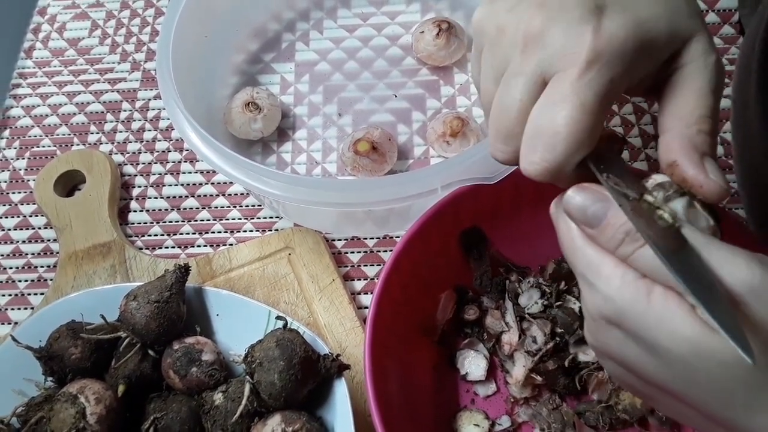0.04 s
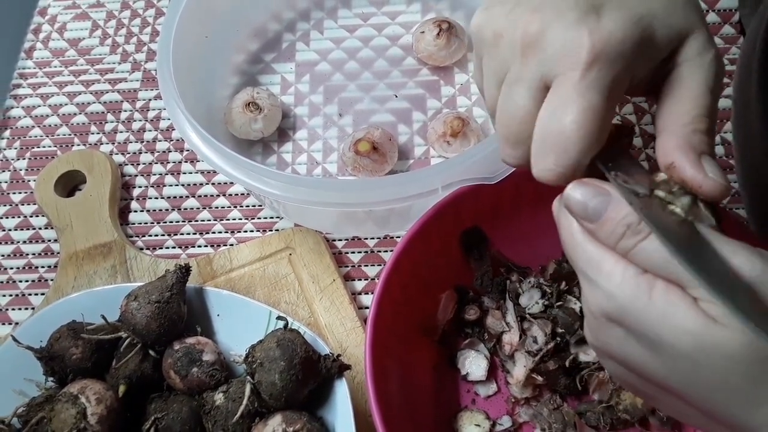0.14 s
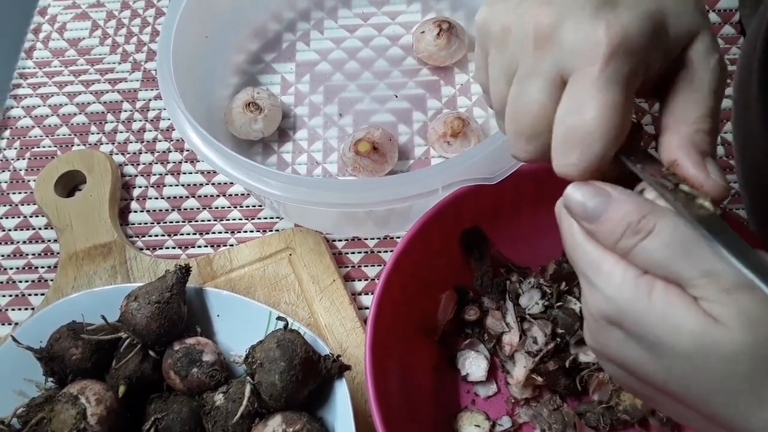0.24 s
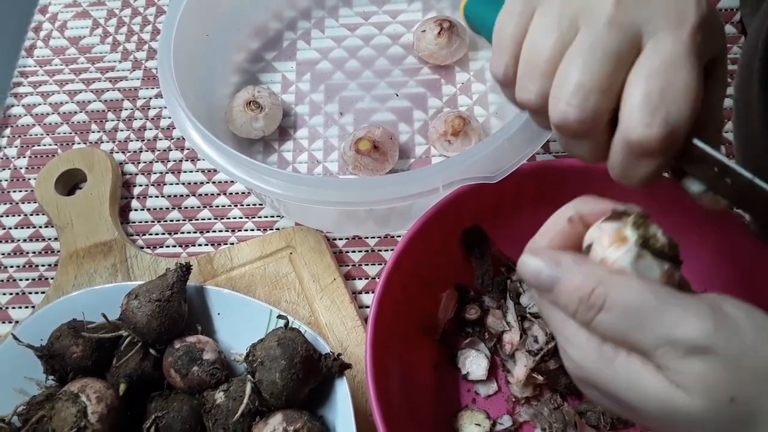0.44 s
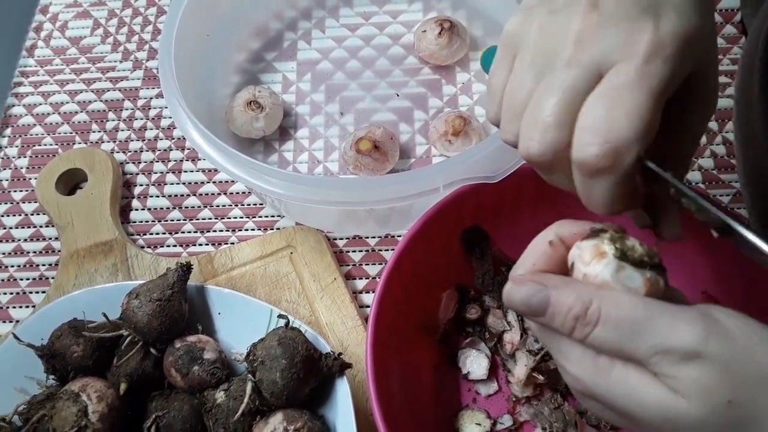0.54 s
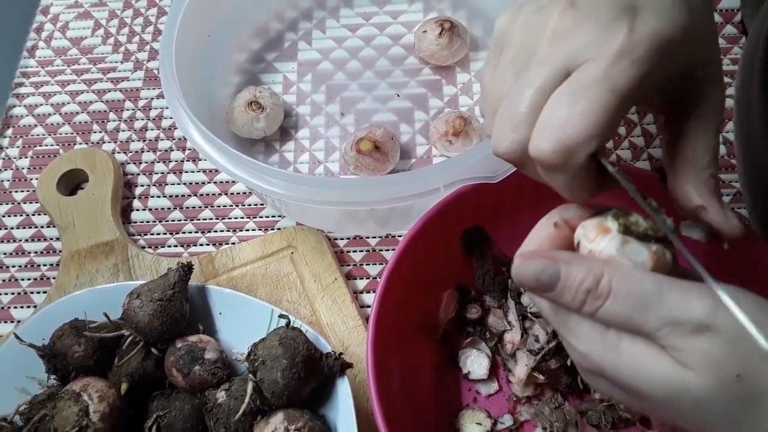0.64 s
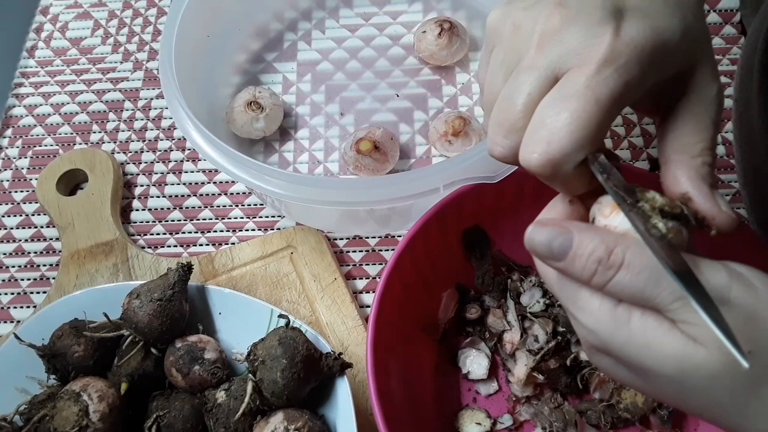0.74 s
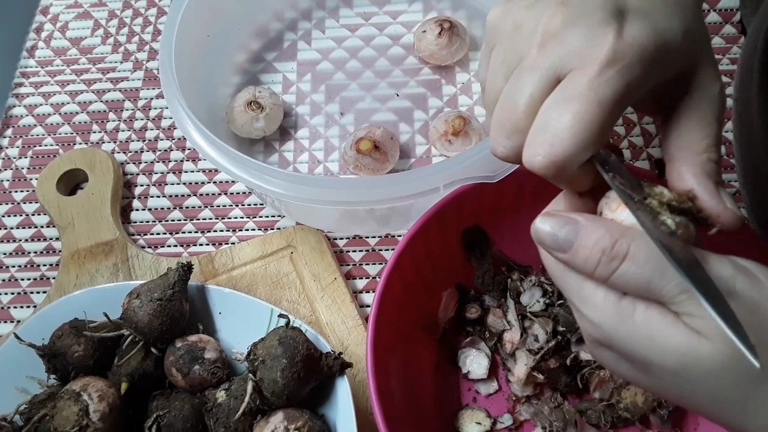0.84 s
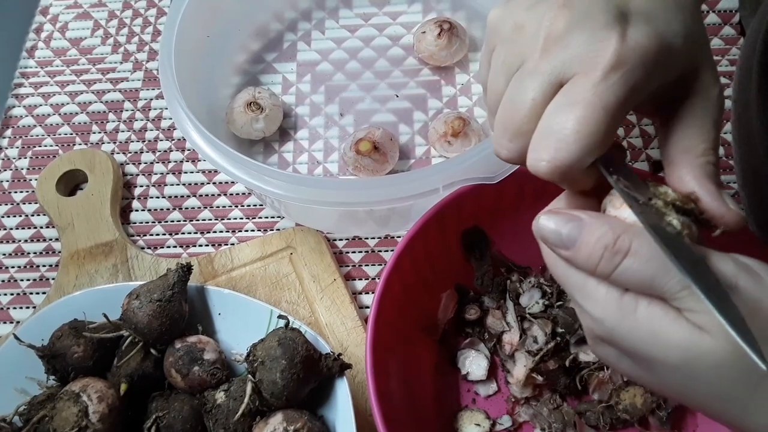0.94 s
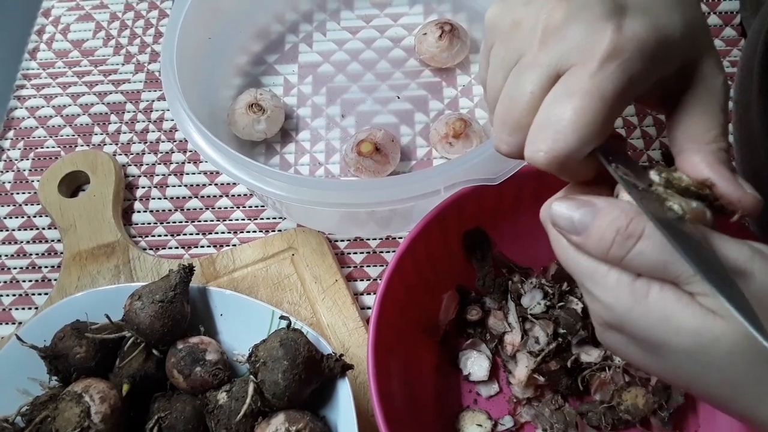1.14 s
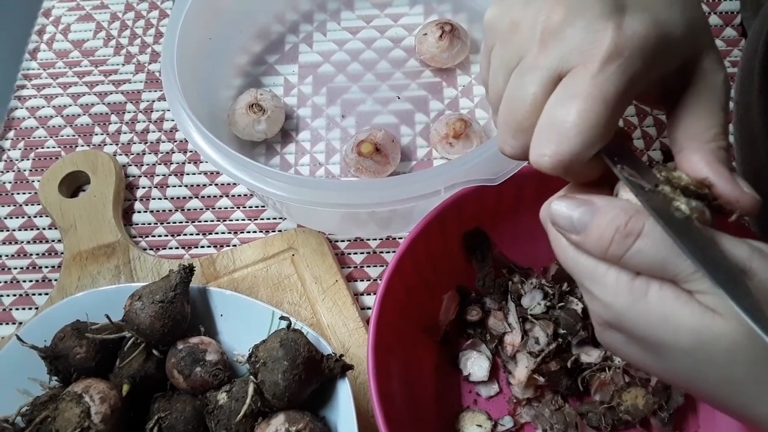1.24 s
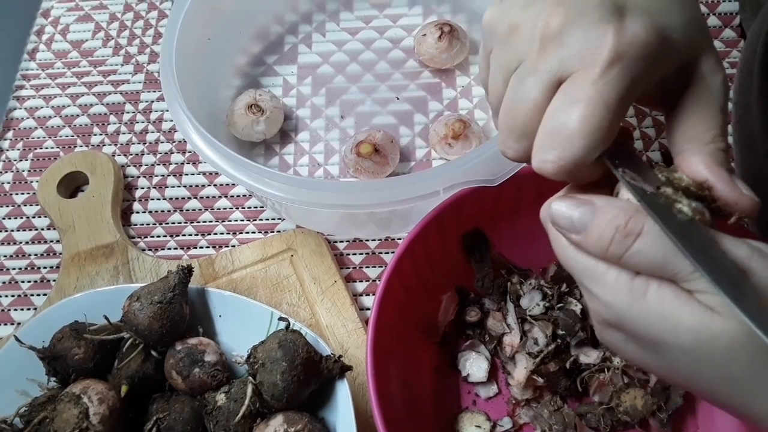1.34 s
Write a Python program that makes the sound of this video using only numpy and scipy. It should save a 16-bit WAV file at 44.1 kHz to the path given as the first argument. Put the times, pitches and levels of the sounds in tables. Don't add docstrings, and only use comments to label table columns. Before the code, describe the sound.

A knife peels a dry bulb close to the microphone: light cracks and scrapes, a small knock on a plastic bowl, one loud snap, then mostly faint fridge hum and a late tick in a small kitchen.

```python
import sys
import numpy as np
from scipy import signal
from scipy.io import wavfile
from scipy.ndimage import uniform_filter1d

SR = 44100
rng = np.random.default_rng(int(sys.argv[2]) if len(sys.argv) > 2 else 0)


def store_wav(level_fs):
    pcm = np.round(np.clip(np.atleast_2d(level_fs), -1, 1) * 32767)
    wavfile.write(sys.argv[1], SR, pcm.T.astype(np.int16))


def decibels_to_gain(level_db):
    exponent = np.asarray(level_db, float) / 20
    return 10 ** exponent


N = 61739

# start_s [s], level_db [dB], extra_treble_db [dB], extra_body_db [dB]
SNAP_EVENTS = [
    (0.198, -20.5, 13, -1),
    (.2064, -15.5, -16, -3),
    (.2200, -17, -12, -3),
    (0.247, -22, 2, 5),
    (0.264, -15.5, 8, 9),
    (.2990, -29, 19, -2),
    (.3187, -38, 14, 10),
    (0.3314, 0.5, 5, 5),
    (0.3759, -5.5, 5.5, 7.5),
    (1.1557, -27.5, 10, 4),
]
# freq_hz [Hz], density_db [dB per Hz]
SKIN_COLOUR = [(1500, -34), (3100, -22.5), (4500, -23.5), (6000, -27.5), (8000, -1.5), (10700, -12),
               (12500, -17.5), (16000, -26)]
# delay_s [s], level_db [dB], extra_treble_db [dB]
NEAR_ECHOES = [(.0009, -12, 4), (.0015, -5, 5), (.0022, -10, 8), (.0030, -11, 7), (.0037, -11, 5),
               (.0044, -9, 1), (.0059, -17, -2), (.0071, -21, -3), (.0093, -25, -3)]
# start_s [s], length_s [s], level_db [dB], port_difference_db [dB], body_db [dB]
BLADE_STROKES = [(0.125, .021, -42, -60, -12.5), (0.1937, 0.038, -35.5, -13, -24),
                 (.227, .012, -40, -20, -26), (0.241, 0.0164, -42.5, -60, -18),
                 (0.252, .06, -51.5, -60, -14.5), (0.324, 0.008, -53, -6.5, -20),
                 (0.369, 0.015, -47.5, -8, -12), (0.392, 0.091, -57, -60, -11),
                 (0.492, 0.055, -58, -60, -8), (1.154, 0.0092, -50, -60, -13)]
# start_s [s], pitch_hz [Hz], level_db [dB], length_s [s]
PINGS = [
    (.2286, 7480, -21, 0.0038),
    (1.1562, 4800, -51, 0.0024),
    (1.157, 7300, -36.5, 0.0039),
    (.377, 1050, -50, 0.0073),
]
# pitch_hz [Hz], level_db [dB], t60_s [s]
BOWL_MODES = [(613, -4.5, 0.015), (805, -4.5, 0.0098), (888, -5.5, .014), (1050, -5, 0.018),
              (1302, 0.5, 0.015), (1550, -6, 0.0073), (2400, -5, 0.011), (3140, -11, 0.0067)]
# delay_s [s], level_db [dB]
BOWL_RATTLES = [(.0014, -2), (.0055, -8), (.0115, -14), (-.015, -15.5), (0.14, -17.5)]
# time_s [s], level_db [dB]
MOTOR_THROB = [(0.0, -52), (0.108, -47.5), (0.166, -67), (0.214, -49.5), (0.28, -61), (0.338, -47.5),
               (0.52, -59), (0.692, -57.5), (0.746, -51), (0.868, -49), (0.914, -73), (0.98, -53),
               (1.21, -51), (1.28, -74), (1.316, -61), (1.4, -59)]
# pitch_hz [Hz], width_hz [Hz], level_db [dB]
MOTOR_HUM = [(99, 7, -68), (116.3, 12.2, -61), (241.5, 9.9, -69), (314.9, 8.7, -61.5), (382.6, 21, -70)]
# pitch_hz [Hz], width_hz [Hz], level_db [dB]
FAN_WHINE = [(1550, 360, -64.5), (2290, 153, -58.5), (2492, 54, -62), (2750, 89, -67), (5204, 170, -69.5),
             (9400, 260, -79), (11990, 450, -97)]
# pitch_hz [Hz], level_db [dB]
MAINS_TONES = [(49.5, -69), (200, -57), (316.5, -67.5)]
# freq_hz [Hz], density_db [dB per Hz]
RUMBLE_COLOUR = [(25, -24), (65, -27), (95, -12.5), (170, -8), (270, -23.5), (330, -18.5), (1000, -24),
                 (2000, -26)]
# freq_hz [Hz], density_db [dB per Hz]
HISS_COLOUR = [(2000, -14), (2500, -4), (3800, -27.5), (5000, -19), (5950, -31), (7500, -11),
               (10300, -10.5), (13000, -28), (15800, -30.5)]


def snaps():
    snap_db, scatter_db, scatter_t60_s = -6.5, -5, 0.022
    out = np.zeros(N + SR)
    for start_s, db, treble_db, body_db in SNAP_EVENTS:
        at = round(start_s * SR)
        out[at:at + 512] += decibels_to_gain(db) * skin(treble_db - 6, body_db - 8)
        signs = rng.choice([-1., 1.], len(NEAR_ECHOES))
        for (delay_s, echo_db, more_db), sign in zip(NEAR_ECHOES, signs):
            k = at + round(delay_s * SR)
            out[k:k + 512] += sign * decibels_to_gain(db + echo_db) * skin(treble_db + more_db, body_db)
        scatter = tail(scatter_t60_s, 0.0022, size=1500)
        spray = np.convolve(skin(treble_db + 4.5, body_db + 2.5), scatter)
        out[at:at + len(spray)] += decibels_to_gain(db + scatter_db) * spray
    return decibels_to_gain(snap_db) * out[:N]


def skin(treble_db, body_db):
    treble_hz, body_hz, top_hz, top_db = 10190, 5000, 14000, 1.5
    ring_hz, ring_width_hz, ring_db = 7950, 350, 1
    rise_s = 0.0003
    hz = np.fft.rfftfreq(2048, 1 / SR)
    lift = treble_db / (1 + (treble_hz / (hz + 1)) ** 12)
    lift += body_db / (1 + (hz / body_hz) ** 8)
    lift += top_db / (1 + (top_hz / (hz + 1)) ** 16)
    port_ring = ring_db / (1 + (2 * (hz - ring_hz) / ring_width_hz) ** 2)
    base = read(SKIN_COLOUR, hz) + port_ring
    rise = np.minimum(np.arange(1, 513) / SR / rise_s, 1)
    return rise * causal(base + lift) / abs(rise * causal(base)).max()


def causal(db):
    mirrored = np.r_[db, db[-2:0:-1]]
    log_gain = np.log(decibels_to_gain(np.maximum(mirrored, -90)))
    phase = -signal.hilbert(log_gain).imag
    return np.fft.ifft(np.exp(log_gain + 1j * phase)).real[:512]


def read(points, hz):
    f, value = np.transpose(points)
    return np.interp(np.log(hz + 1), np.log(f + 1), value)


def tail(t60_s, start_s, size):
    t = np.arange(size) / SR
    h = rng.standard_normal(size) * decibels_to_gain(-60 * t / t60_s) * np.clip(t / start_s, 0, 1) ** 2
    return h / np.linalg.norm(h)


def evened(x):
    return x / np.sqrt(np.mean(x ** 2) + 1e-20)


def filtered(x, order, hz, kind):
    return signal.sosfilt(signal.butter(order, hz, kind, fs=SR, output="sos"), x)


def strokes():
    grains_per_s, grain_spread_db, side_hz = 9000, 2.5, 4540
    edge = 0.2
    t = np.arange(N) / SR
    grains = decibels_to_gain(grain_spread_db * np.minimum(rng.exponential(1, N), 4))
    grains *= rng.choice([-1., 1.], N)
    grains *= rng.random(N) < grains_per_s / SR
    both = evened(np.convolve(grains, skin(treble_db=7.5, body_db=7.0))[:N])
    apart = evened(filtered(uniform_filter1d(grains, size=2), 6, side_hz, "high"))
    body = evened(filtered(grains, 2, (2800, 5600), "band"))
    mid, side = np.zeros((2, N))
    for start_s, length_s, db, apart_db, body_db in BLADE_STROKES:
        u = np.clip((t - start_s) / length_s, 0, 1)
        push = decibels_to_gain(db) * np.minimum(u / edge, 1) * np.minimum((1 - u) / edge, 1)
        mid += push * (both + decibels_to_gain(body_db) * body)
        side += push * decibels_to_gain(apart_db) * apart
    return mid, side


def pings():
    t, out = np.arange(N) / SR, np.zeros(N)
    for start_s, hz, db, length_s in PINGS:
        swell = np.sin(np.pi * np.clip((t - start_s) / length_s, 0, 1))
        out += decibels_to_gain(db) * swell * np.sin(2 * np.pi * hz * t)
    return out


def knock():
    knock_s, knock_db, rise_s, low_hz = 0.2272, -25.5, 0.00063, 460
    t, out = np.arange(N) / SR, np.zeros(N)
    for delay_s, db in [(0.00054, 0)] + list(BOWL_RATTLES):
        u = np.maximum(t - knock_s - delay_s, 0)
        rise = np.minimum(u / rise_s, 1)
        for hz, mode_db, t60_s in BOWL_MODES:
            decay = decibels_to_gain(db + mode_db - 60 * u / t60_s)
            ring = np.sin(2 * np.pi * hz * rng.uniform(0.95, 1.03) * u)
            out += decay * ring * rng.choice([-1, 1]) * rise
    return decibels_to_gain(knock_db) * filtered(out, 3, low_hz, "high")


def kitchen(x):
    t60_s, treble_t60_s, split_hz, body_db = 0.55, 0.22, 9500, 4
    h = filtered(tail(t60_s, 0.004, size=SR), 2, split_hz, "low")
    h = h + filtered(tail(treble_t60_s, 0.004, size=SR), 2, split_hz, "high")
    h = h + decibels_to_gain(body_db) * filtered(h, 2, (3300, 5600), "band")
    return signal.fftconvolve(x, h)[:N]


def fridge():
    tones = np.zeros(N)
    for hz, width_hz, db in list(MOTOR_HUM) + list(FAN_WHINE):
        tones += decibels_to_gain(db) * evened(resonate(rng.standard_normal(2 * N), hz, width_hz)[N:])
    throb_db = np.interp(np.arange(N) / SR, *np.transpose(MOTOR_THROB))
    tones += decibels_to_gain(throb_db) * tone(157, wander_hz=3.5)
    tones += decibels_to_gain(-66.5) * tone(12185, wander_hz=20)
    for hz, db in MAINS_TONES:
        tones += decibels_to_gain(db) * tone(hz, wander_hz=0.52)
    return wash(RUMBLE_COLOUR, -54, size=4096) + wash(HISS_COLOUR, -54.5, size=1024) + tones


def resonate(x, hz, width_hz):
    turn = np.exp(2j * np.pi * hz * np.arange(len(x)) / SR)
    r = np.exp(-np.pi * width_hz / SR)
    once = signal.lfilter([1], [1, -r], x / turn)
    return (turn * signal.lfilter([1], [1, -r], once)).real


def tone(hz, wander_hz):
    drift = evened(uniform_filter1d(rng.standard_normal(N), 3000))
    return np.sqrt(2) * np.sin(2 * np.pi * np.cumsum(hz + wander_hz * drift) / SR)


def wash(points, db, size):
    patchy_db, swell_db = 1.5, -0.22
    frames, hz = N * 4 // size + 5, np.fft.rfftfreq(size, 1 / SR)
    a, b, p = rng.standard_normal((frames, size // 2 + 1, 3)).T
    patches = evened(uniform_filter1d(uniform_filter1d(p, 10, 0), 8, 1))
    swell = evened(uniform_filter1d(rng.standard_normal(frames), 20))
    inside = (hz >= points[0][0]) & (hz <= points[-1][0])
    gain = decibels_to_gain(read(points, hz)[:, None] + patchy_db * patches + swell_db * swell)
    z = (a + 1j * b) * gain * inside[:, None]
    noise = signal.istft(z, nperseg=size, noverlap=size * 3 // 4)[1][:N]
    return decibels_to_gain(db) * evened(noise)


def scene():
    room_db = -13
    scrape, side = strokes()
    work = snaps() + scrape + knock() + pings()
    mid = work + decibels_to_gain(room_db) * kitchen(work) + fridge()
    return np.array([mid + side, mid - side])


def roll_off(x):
    return signal.sosfilt(signal.butter(12, 16450, fs=SR, output="sos"), x)


def record(dry):
    edge_hz, offset = 16200, -0.0007
    lowpass = signal.firwin(255, edge_hz, window=("kaiser", 6), fs=SR)
    mix = signal.oaconvolve(dry, lowpass[None], "same") + offset
    return roll_off(mix)


dry = scene()
out = record(dry)
store_wav(out)
```